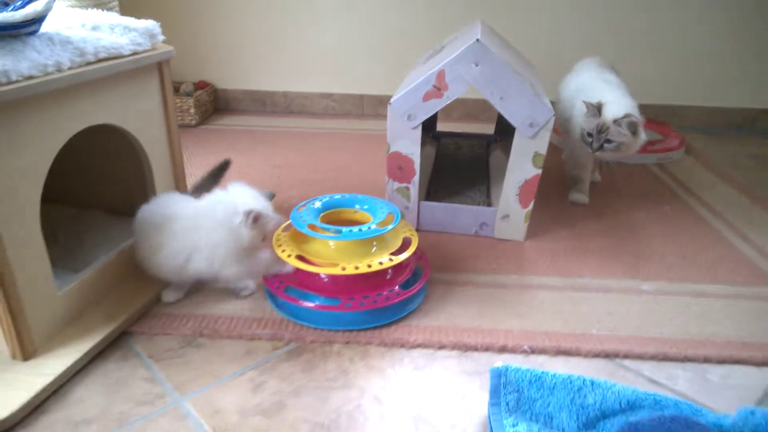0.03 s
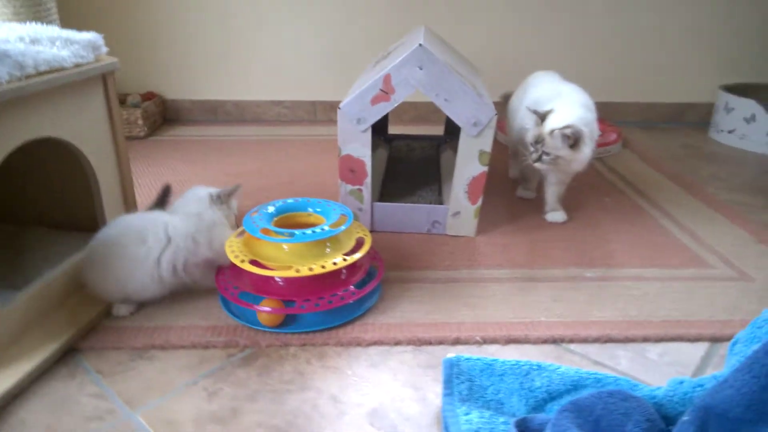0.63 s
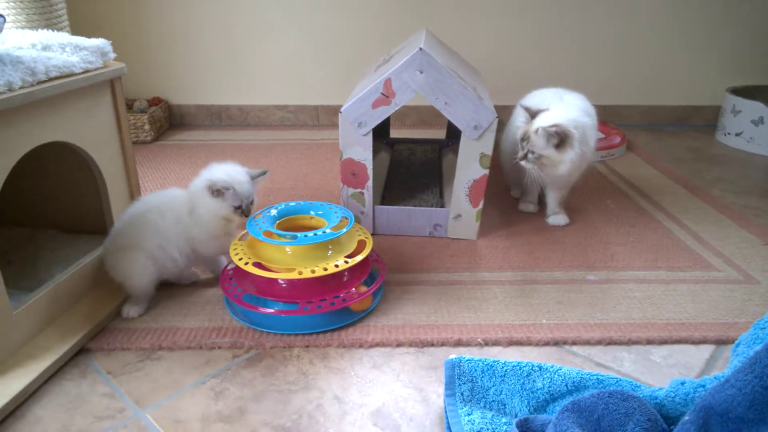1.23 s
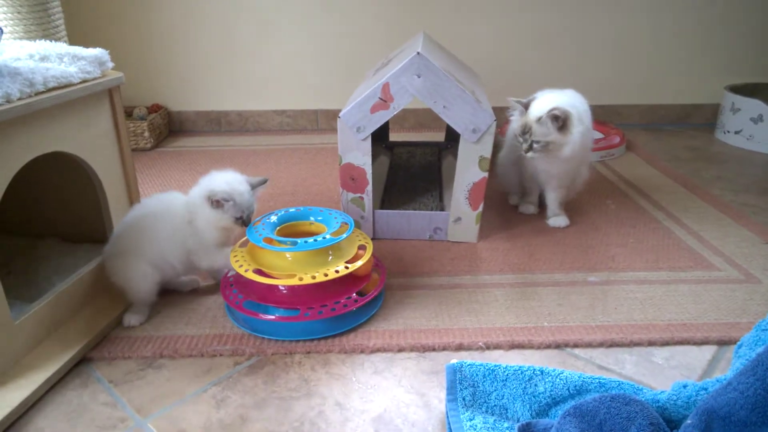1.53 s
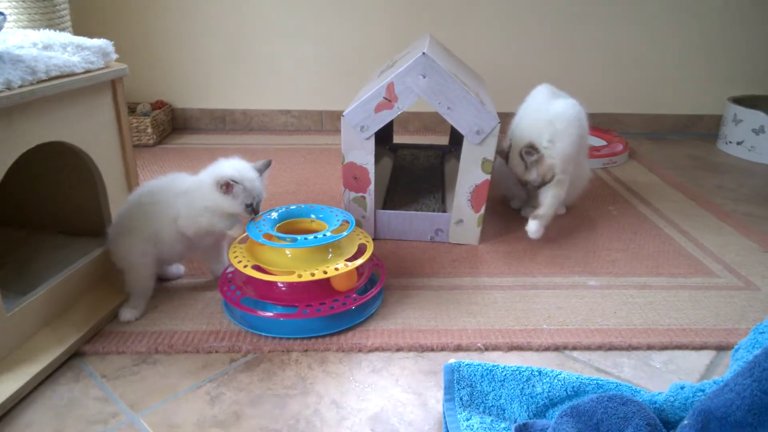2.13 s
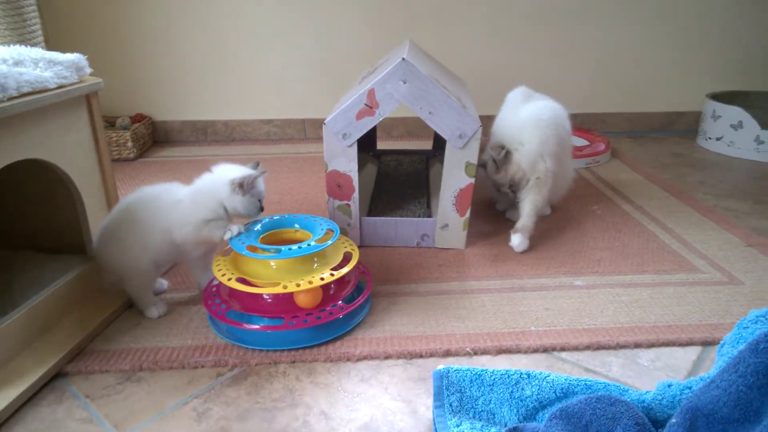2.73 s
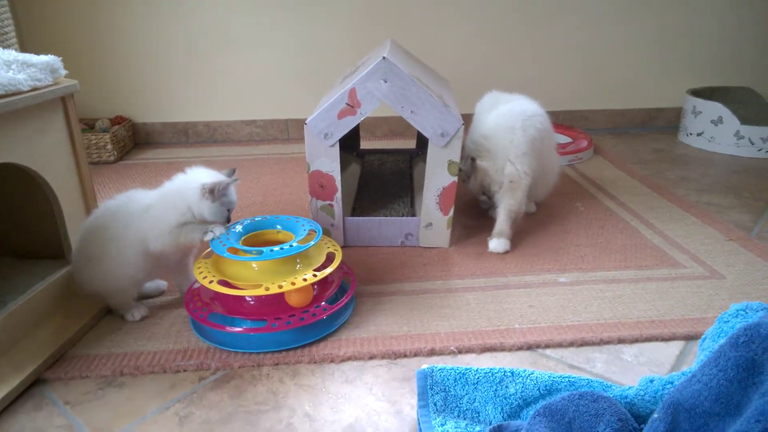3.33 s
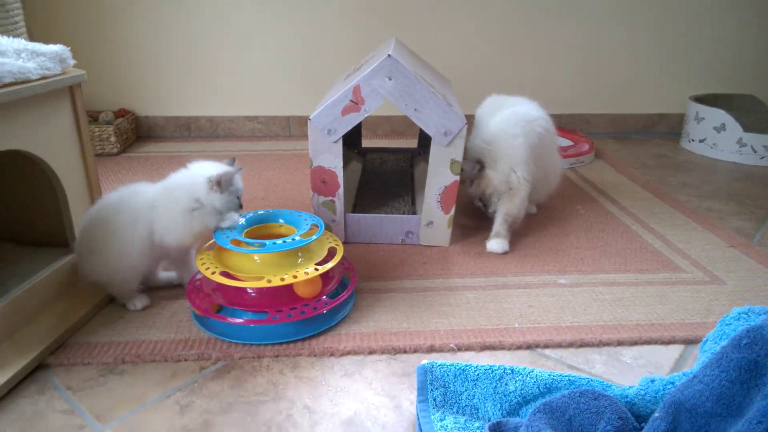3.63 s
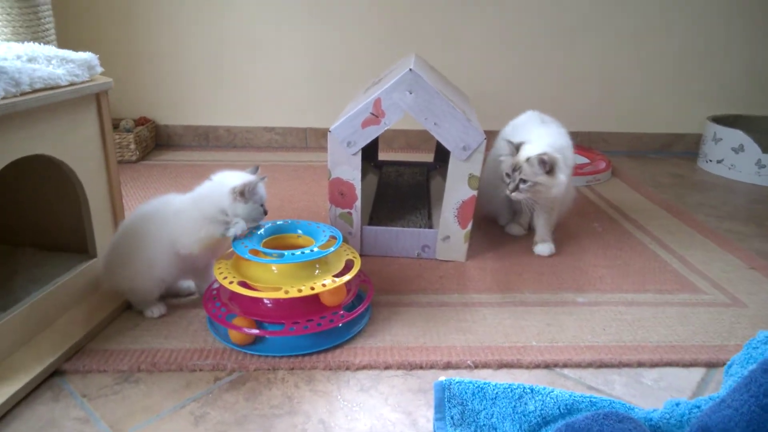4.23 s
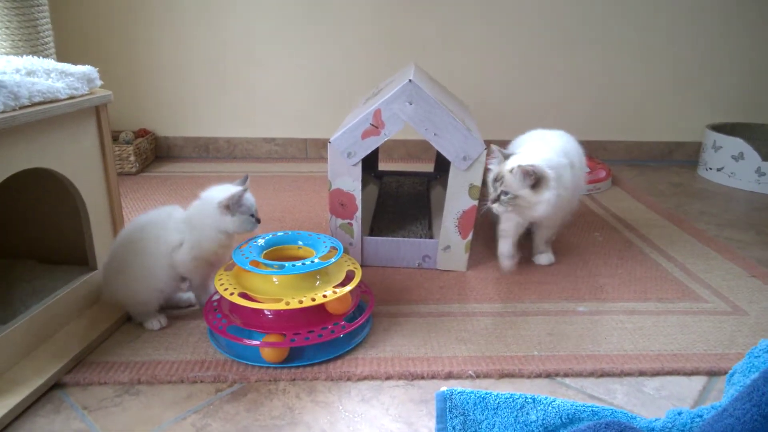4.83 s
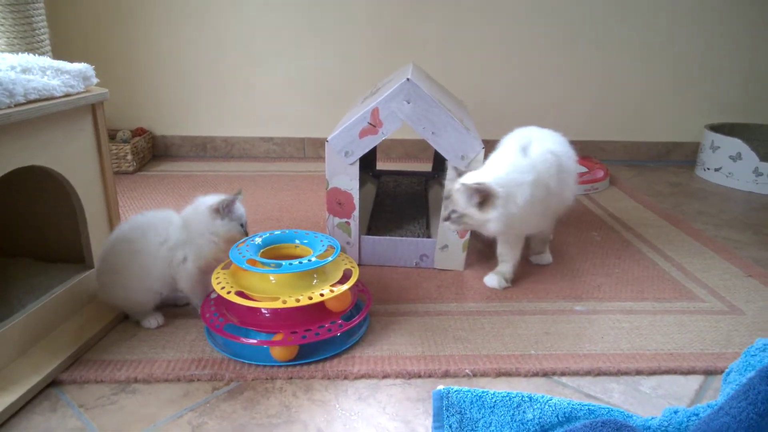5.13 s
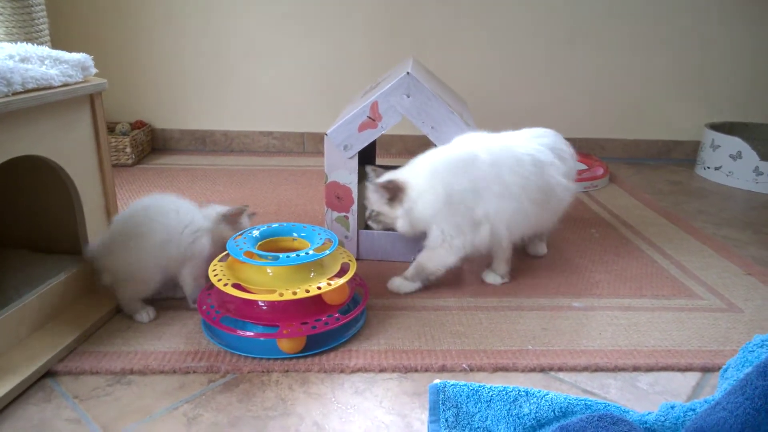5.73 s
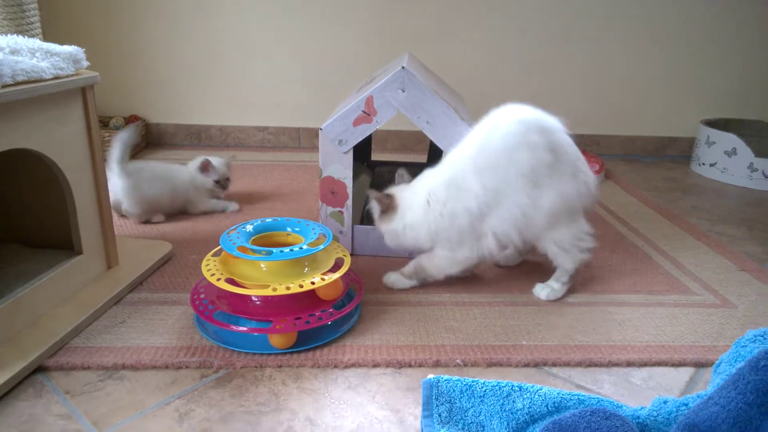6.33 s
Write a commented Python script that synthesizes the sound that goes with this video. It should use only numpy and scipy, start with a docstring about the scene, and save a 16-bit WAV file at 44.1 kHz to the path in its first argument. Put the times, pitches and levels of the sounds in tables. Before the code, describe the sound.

In a small, quiet room with a faint hum, a cat makes two fluttering calls, the first short, the second longer and smoothing into a rising coo. Before them, a ball knocks sharply in a hollow plastic toy, then rolls and rattles slowly to rest. At the end, paws thud lightly and brush over a rug. The sound is in stereo, a short way off, with a slight room ring.

```python
"""A cat gives two trilling calls, its buzzing vocal folds pinched by a flutter in the throat; the second
smooths out into a rising coo. A pair of microphones hears it in a small, quiet room with a low hum.
Before the calls a kitten bats a ball round a plastic track toy on the rug: the toy skids, and the ball
clacks, rolls and slowly comes to rest. At the end paws thud and brush over the rug."""
import sys
import numpy as np
from scipy import signal
from scipy.fft import rfft, irfft, next_fast_len
from scipy.io import wavfile
from scipy.ndimage import uniform_filter1d

SR = 44100
rng = np.random.default_rng(int(sys.argv[2]) if len(sys.argv) > 2 else 0)


def file_out(sig):
    """Save sig as 16-bit WAV at sys.argv[1]."""
    # one column per channel
    cols = np.atleast_2d(sig).T
    # limit, then scale
    lim = np.clip(cols, -1, 1)
    pcm = np.round(lim * 32767).astype(np.int16)
    wavfile.write(sys.argv[1], SR, pcm)


N = 285768
TIME = np.arange(N) / SR


def amp(db):
    """Decibels to gain."""
    return 10 ** (np.asarray(db) / 20)


def unit(x):
    """Scales to rms 1."""
    return x / np.sqrt(np.mean(x ** 2) + 1e-20)


def read(points, hz):
    """Reads a spectrum on a log-frequency axis."""
    f, value = np.transpose(points)
    return np.interp(np.log(hz + 1), np.log(f + 1), value)


def curves(rows, t):
    """Reads every column of a table at times t."""
    s, *columns = np.transpose(rows)
    return [np.interp(t, s, c) for c in columns]


def shape(x, gain):
    """Filters x by a gain given as a function of frequency."""
    n = x.shape[-1]
    size = next_fast_len(n + 2048)
    return irfft(rfft(x, size) * gain(np.fft.rfftfreq(size, 1 / SR)), size)[..., :n]


def colour(x, points, size=8192):
    """Gives x a spectrum, at rms 1; the filter is causal, so it rings after each pulse."""
    log_gain = np.log(amp(read(points, abs(np.fft.fftfreq(size, 1 / SR)))))
    kernel = np.fft.ifft(np.exp(np.conj(signal.hilbert(log_gain)))).real[:size // 2]
    return unit(np.apply_along_axis(lambda v: signal.oaconvolve(v, kernel)[:len(v)], -1, x))


def add(mix, s, sound):
    """Mixes a sound in at s seconds."""
    part = mix[..., max(round(s * SR), 0):][..., :sound.shape[-1]]
    part += sound[..., :part.shape[-1]]


# How alike the room sounds at the two microphones. Each row: frequency in Hz, likeness from 0 to 1.
MIC_LIKENESS = [(30, 0.62), (60, 0.42), (130, 0.68), (290, 0.83), (640, 0.73), (1410, 0), (3100, 0),
                (15000, 0)]


def diffuse(a, b):
    """Sound from all round reaches the microphones alike in the bass, unlike in the treble."""
    likeness = lambda f: np.clip(read(MIC_LIKENESS, f), -1, 1)
    return np.array([a, shape(a, likeness) + shape(b, lambda f: np.sqrt(1 - likeness(f) ** 2))])


# The short ring of the small room. Each row: frequency in Hz, seconds to fall 60 dB.
ROOM_DECAY = [(150, 0.32), (600, 0.39), (2000, 0.2), (8000, 0.24), (16000, 0.05)]


def room(x, wet_db, pan_db, lag_samples, scatter_hz, early_db=7):
    """Direct sound, echoes off floor and furniture, and a tail; pan and lag are left against right."""
    size = SR // 2
    echoes = rng.standard_normal((2, size)) * (rng.random((2, size)) < .15)
    hz, t, bands = signal.stft(echoes, SR, nperseg=256)
    bands *= amp(-60 * t / read(ROOM_DECAY, hz)[:, None])
    tail = diffuse(*signal.istft(bands, SR, nperseg=256)[1])
    t = np.arange(tail.shape[1]) / SR
    tail *= (t > .001) * (1 + amp(early_db) * np.exp(-t / 0.013))
    tail /= np.linalg.norm(tail[0])
    # small objects scatter the treble most
    tail = shape(tail, lambda f: (f + 60) / np.hypot(f + 60, scatter_hz))
    wet = signal.fftconvolve(x[None], tail, axes=1)[:, :N]
    left = shape(x, lambda f: np.exp(-2j * np.pi * f * lag_samples / SR))
    return (np.array([left, x]) + amp(wet_db) * wet) * amp([[pan_db / 2], [-pan_db / 2]])


# Steady air noise all round the microphones. Each row: frequency in Hz, relative level in dB.
AIR_SPECTRUM = [(15, -10), (35, -7.5), (60, -5.5), (100, -11.5), (200, -21), (320, -25), (450, -25.5),
                (850, -28.5), (1400, -35.5), (2400, -38), (6000, -44.5), (11800, -48), (13800, -42.5),
                (15800, -50.5)]
# The hum of the room. Each row: centre in Hz, width in Hz, level in dB.
HUM_BANDS = [(39.74, 11.8, -57.5), (114, 7.8, -72), (161.94, 8.2, -67), (251.8, 9, -74)]


def room_tone(air_db=-58.5, bass_pan_db=-3.0):
    """Air noise and narrow, wavering bands of hum; the bass is stronger at the right microphone."""
    tone = amp(air_db) * colour(rng.standard_normal((2, N)), AIR_SPECTRUM)
    for hz, width, db in HUM_BANDS:
        band = shape(rng.standard_normal((2, N)), lambda f: 1 / (1 + (2 * (f - hz) / width) ** 2))
        tone += amp(db) * unit(band)
    sides = np.array([[.5], [-.5]])
    return shape(diffuse(*tone), lambda f: amp(sides * bass_pan_db / (1 + (f / 220) ** 4)))


# Paws landing on the rug. Each row: start in seconds, level in dB, cutoff in Hz, seconds to fall 60 dB.
PAW_FALLS = [(.722, -54, 433, 0.13), (6.029, -51, 1340, 0.17), (6.044, -58, 1220, 0.42),
             (6.297, -61, 1220, 0.091), (6.318, -55, 574, 0.23)]
# Fur and claws brushing rug and toy.
# Each row: midpoint in seconds, length in seconds, level in dB, centre in Hz, width in octaves.
FUR_BRUSHES = [(.468, .05, -70, 9600, .18), (.93, .12, -76, 9300, .4), (1.36, .19, -71, 8500, .87),
               (1.863, .026, -63.5, 3300, .48), (1.971, .045, -66.5, 10400, .47),
               (3.627, .098, -78, 4770, .092), (5.806, .12, -72.5, 5750, .57),
               (6.029, .05, -67.5, 5560, .41), (6.325, .21, -72.5, 3830, .9)]
# A broad scuff on the rug. Each row: frequency in Hz, relative level in dB.
SCUFF_SPECTRUM = [(500, -20), (1050, 0), (1650, -12), (2600, -3), (3600, -9), (8000, -9), (12000, -10),
                  (16000, -14)]


def paws(scuff_mid_s=6.118, scuff_length_s=.086, scuff_db=-55.5):
    """Down on the rug: dull thuds, soft swishes, and one scuff as the kitten springs away."""
    out, t = np.zeros(N), np.arange(SR // 3) / SR
    fibres = lambda: rng.standard_normal(len(t)) * amp(1.5 * rng.standard_normal(len(t)))
    stroke = lambda length: np.sin(np.pi * np.minimum(t / length, 1)) ** 2
    for s, db, dull_hz, t60 in PAW_FALLS:
        band = lambda f: f ** 2 / (f ** 2 + 140 ** 2) / (1 + (f / dull_hz) ** 8)
        thud = unit(shape(rng.standard_normal(len(t)), band))
        add(out, s, amp(db - 60 * t / t60) * thud)
    for s, length, db, centre_hz, octaves in FUR_BRUSHES:
        band = lambda f: np.exp(-.5 * (np.log2((f + 1) / centre_hz) / octaves) ** 2)
        swish = unit(shape(fibres(), band))
        add(out, s - length / 2, amp(db) * swish * stroke(length))
    scuff = colour(fibres(), SCUFF_SPECTRUM) * stroke(scuff_length_s)
    add(out, scuff_mid_s - scuff_length_s / 2, amp(scuff_db) * scuff)
    return room(out, wet_db=-2, pan_db=0.5, lag_samples=-1.6, scatter_hz=900)


# Modes of the hollow plastic track and of its thin walls.
# Each row: frequency in Hz, relative level in dB, seconds to fall 60 dB.
HOLLOW_MODES = [(472.4, -0.5, 0.14), (530.3, -4.5, 0.11), (623, -18, 0.17), (680, -1.5, 0.032),
                (830, -7.5, 0.028)]
WALL_MODES = [(1070, -4, 0.048), (1188, -4, 0.1), (1402, 0.5, 0.035), (1495, -4, 0.078),
              (1653, -2.5, 0.048), (1905, -1, 0.038), (2180, -3.5, 0.036), (2340, -8, 0.027),
              (2640, -14, 0.023), (3390, -12, 0.052)]


def track_ring(modes, t, vary):
    """Modes of the track after a blow; their weights vary with the place that is struck."""
    hz, db, t60 = np.transpose(modes)[:, :, None]
    weight = amp(db) * (1 + vary * (2 * rng.random(hz.shape) - 1))
    weight *= np.sign(rng.standard_normal(hz.shape))
    hz = hz * (1 + 0.039 * vary * rng.standard_normal(hz.shape))  # the ball's weight shifts the modes
    ring = (weight * amp(-60 * t / t60) * np.cos(2 * np.pi * hz * t)).sum(0)
    return ring / np.sqrt(np.mean(ring[t < .01] ** 2))


def bumps(per_s=900, spread_db=0):
    """Tiny impacts at random moments, of uneven strength."""
    impacts = rng.standard_normal(N) * (rng.random(N) < per_s / SR)
    return impacts * amp(spread_db * rng.uniform(-1, 1, N))


def ringing(taps, modes):
    """A train of taps keeps modes of the track ringing."""
    ring = track_ring(modes, np.arange(SR // 3) / SR, vary=0)
    return unit(signal.fftconvolve(taps, ring)[:N])


# The batted toy skids on the rug. Each row: start in seconds, length in seconds, level in dB.
TOY_SKIDS = [(.046, .022, -57), (.1, .048, -55), (.163, .14, -56)]
# The toy's gritty scrape, and its hiss on the rug. Each row: frequency in Hz, relative level in dB.
SCRAPE_SPECTRUM = [(400, -17.5), (900, 8.5), (1400, -7), (2300, -3), (3200, -9), (6000, -20.5),
                   (7600, -19.5), (11000, -20), (16000, -17.5)]
RUG_HISS_SPECTRUM = [(300, -20), (1800, 3), (3500, -2.5), (6000, -6), (8000, 0), (11500, -2), (16000, -7)]


def toy_skids(hollow_db=5, scrape_db=-2.5, hiss_db=-3.5, rise_s=.008, sag_db_per_s=40, stop_db_per_s=350):
    """Each skid starts at once, sags and stops; it shakes the whole toy and hisses on the rug."""
    level = np.zeros(N)
    for s, length, db in TOY_SKIDS:
        t = np.maximum(TIME - s, 0)
        fall_db = sag_db_per_s * t + stop_db_per_s * np.maximum(t - length, 0)
        level += np.minimum(t / rise_s, 1) * amp(db - fall_db)
    shake = amp(hollow_db) * ringing(bumps(), HOLLOW_MODES) + ringing(bumps(), WALL_MODES)
    scrape = amp(scrape_db) * colour(bumps(), SCRAPE_SPECTRUM)
    hiss = amp(hiss_db) * colour(bumps() + 0.094 * rng.standard_normal(N), RUG_HISS_SPECTRUM)
    return room((shake + scrape + hiss) * level, wet_db=0, pan_db=0.2, lag_samples=-.95, scatter_hz=1170)


# The ball rolls on, is nudged at about 1 s and dies away.
# Each row: time in seconds, rumble level in dB, scrape and rattle level in dB.
ROLL_LEVELS = [(0, -68, -70), (.45, -55, -70), (.66, -71, -70), (.88, -67, -72), (1.0, -54, -70),
               (1.22, -60, -73), (1.42, -68, -86), (1.75, -63, -88), (2.12, -73, -88), (2.3, -67, -75),
               (2.7, -68, -83), (2.95, -90, -77), (3.6, -90, -90)]
# Light ticks of the rattling ball. Each row: frequency in Hz, relative level in dB.
TICK_SPECTRUM = [(500, -16), (1000, -6), (1900, -1), (2700, 0), (3800, -7), (5500, -19), (9000, -19),
                 (16000, -30)]


def ball_roll(rumble_db=-2, walls_db=-6, scrape_db=-4, rattle_db=-9, tick_db=-11):
    """Bumps under the ball make the track ring and scrape; at random it rattles against the walls."""
    low_db, grit_db = curves(ROLL_LEVELS, TIME)
    rumble = amp(rumble_db) * ringing(bumps(), HOLLOW_MODES)
    walls = amp(walls_db) * ringing(bumps(), WALL_MODES)
    scrape = amp(scrape_db) * colour(bumps(), SCRAPE_SPECTRUM)
    taps = bumps(per_s=28, spread_db=3)
    rattle = amp(rattle_db) * ringing(taps, WALL_MODES) + amp(tick_db) * colour(taps, TICK_SPECTRUM)
    ball = rumble * amp(low_db) + (walls + scrape + rattle) * amp(grit_db)
    return room(ball, wet_db=0, pan_db=0.2, lag_samples=-2.2, scatter_hz=1170)


# Clear knocks of the ball, midway between the microphones.
# Each row: start in seconds, then relative levels in dB of hollow ring, wall clack and hard snap.
BALL_KNOCKS = [(.043, -46, -55, -44), (.052, -43, -50, -43), (.058, -45, -55, -45), (.083, -28, -36, -32),
               (.089, -36, -44, -58), (.113, -45, -42, -43), (.163, -41, -41, -47), (.177, -52, -43, -53),
               (.194, -42, -43, -57), (.219, -45, -47, -67), (.381, -56, -66, -51), (.71, -59, -67, -67),
               (.822, -54, -65, -68), (.931, -57, -61, -74), (1.0, -49, -75, -82), (1.085, -70, -62, -77),
               (1.235, -58, -51, -50.5), (1.319, -56, -66, -69), (1.687, -50, -76, -72),
               (1.794, -52, -62, -69), (1.815, -47.5, -64, -82), (2.255, -59, -62, -68),
               (2.374, -62, -61, -65), (2.485, -56, -59, -68)]
# The hard snap of ball on plastic. Each row: frequency in Hz, relative level in dB.
SNAP_SPECTRUM = [(300, -27), (900, -5), (2000, 0), (3500, 0.5), (5000, -4), (6400, -10.5), (7500, 0.5),
                 (9000, -2.5), (10600, 2), (12500, -4), (16000, -19)]


def ball_knocks(ring_db=-2.5, clack_db=-4.0, snap_db=4, snap_t60=0.0092,
                tick_db=-6, tick_t60=.04, damping_per_s=45, contact_s=.0015):
    """Each knock is a hard snap, a clack of the walls with a light tick, and the track's hollow ring."""
    out, t = np.zeros(N), np.arange(SR // 3) / SR
    hardest_db = max(row[1] for row in BALL_KNOCKS)
    for s, hollow_db, wall_db, hard_db in BALL_KNOCKS:
        force = amp(hollow_db - hardest_db)
        # a hard blow is brighter, and presses the toy into the rug
        modes = [(hz, db + 9 * force * np.log2(hz / HOLLOW_MODES[0][0]), t60)
                 for hz, db, t60 in HOLLOW_MODES]
        hollow = track_ring(modes, t, vary=0.6) * np.exp(-damping_per_s * force * t)
        hollow *= 1 - np.exp(-t * (1 + 9 * force) / contact_s)  # a gentle one presses longer: soft start
        clack = track_ring(WALL_MODES, t, vary=0.61)
        clack += colour(rng.standard_normal(len(t)), TICK_SPECTRUM) * amp(tick_db - 60 * t / tick_t60)
        snap = colour(rng.standard_normal(len(t)), SNAP_SPECTRUM) * amp(-60 * t / snap_t60)
        add(out, s, amp(hollow_db + ring_db) * hollow)
        add(out, s, amp(wall_db + clack_db) * clack)
        add(out, s, amp(hard_db + snap_db) * snap)
    return room(out, wet_db=-3, pan_db=0.0, lag_samples=-1.12, scatter_hz=1180)


def fold_turns(hz, beat, depth, slip=0.094):
    """Vocal fold cycles: after each deep pinch they start afresh, nearly in step with the flutter."""
    turns = np.cumsum(hz) / SR
    pinches = np.flatnonzero(np.diff(np.floor(beat + .5)))
    cycles = np.diff(turns[pinches], prepend=0)
    restart = np.round(cycles) - cycles + slip * rng.standard_normal(len(cycles))
    jumps = np.zeros(len(hz))
    jumps[pinches] = restart * np.minimum(2 * depth[pinches], 1) ** 2
    return turns + uniform_filter1d(np.cumsum(jumps), size=260)


def call(voice, flutter, throat, swing, jitter, air, rough, rough_per_db,
         hum_db, hum_follow, ring_db, edge_db, edge_follow, edge_lag_s,
         coo_s=5.145, coo_half_s=.09, coo_ease=.76, coo_edge_db=-8):
    """Vocal folds buzz while a slowing flutter pinches them; the pitch sags at each pinch."""
    t = np.arange(voice[0][0], voice[-1][0], 1 / SR)
    hz, effort_db = curves(voice, t)
    top_db = effort_db.max()
    slack_db = top_db - effort_db
    # in the coo that ends the trill the throat relaxes: flutter, roughness and edge all ease
    coo = np.exp(-((t - coo_s) / coo_half_s) ** 4)
    tension = 1 - coo_ease * coo
    beat_s, beats_per_s, slowing, depth = flutter
    beat = beats_per_s * (t - beat_s) - slowing * (t - beat_s) ** 2 / 2
    gape = np.cos(2 * np.pi * beat)  # -1 at each pinch
    depth = np.clip(depth * tension, 0, 1)
    rough = np.clip((rough + rough_per_db * slack_db) * tension, 0, 1)  # a weak voice is rougher
    wobble = unit(shape(rng.standard_normal(len(t)), lambda f: 1 / (1 + (f / 130) ** 4)))
    pitch_hz = hz * (1 + swing * depth * (gape - .5) + jitter * rough * wobble)
    turns = fold_turns(pitch_hz, beat, depth)
    folds = unit(np.cos(2 * np.pi * np.arange(1, 25)[:, None] * turns).sum(0))
    puffs = unit((1 + 0.23 * np.cos(2 * np.pi * turns)) * rng.standard_normal(len(t)))
    puffs = shape(puffs, lambda f: np.sqrt(1 + (f / 1500) ** 2))  # air noise grows towards the treble
    sound = colour(((1 - rough) * folds + air * rough * puffs) / np.hypot(1 - rough, rough), throat)
    # effort drives the open-mouth ring directly, the nasal hum and buzzing edge by their follow factors
    below = lambda f, cutoff_hz: 1 / (1 + (f / cutoff_hz) ** 16)
    hum = unit(shape(sound, lambda f: below(f, 567))) * amp(hum_db - hum_follow * slack_db)
    ring = unit(shape(sound, lambda f: below(f, 2080) - below(f, 620))) * amp(ring_db - slack_db)
    edge = unit(shape(sound, lambda f: 1 - below(f, 2060)))
    late_slack_db = np.interp(t - edge_lag_s, t, slack_db)
    edge *= amp(edge_db - edge_follow * late_slack_db + coo_edge_db * coo)
    opening = (1 + depth * gape) / np.sqrt(1 + depth ** 2 / 2)
    return t[0], amp(top_db) * (hum + ring + edge) * opening * signal.windows.tukey(len(t), .09)


# The course of each call. Each row: time in seconds, pitch in Hz, effort in dB.
CHIRRUP_VOICE = [(3.69, 346, -79), (3.73, 348, -60), (3.76, 353, -52), (3.785, 360, -44), (3.83, 366, -41),
                 (3.935, 362, -44), (4.0, 351, -54), (4.075, 319, -63.5), (4.2, 310, -81)]
TRILL_VOICE = [(4.51, 379, -73), (4.56, 378, -49.5), (4.69, 368, -54.5), (4.79, 369, -51),
               (4.92, 365, -57.5), (5.07, 361, -57.5), (5.16, 381, -47), (5.24, 389, -54.5),
               (5.3, 380, -82)]
# The resonances of the throat in each call. Each row: frequency in Hz, relative level in dB.
CHIRRUP_RESONANCES = [(150, -45), (250, -3), (320, -6), (400, -2.5), (530, -14), (720, 2), (1080, -2),
                      (1270, -16), (1820, -17), (2100, -29), (3200, -22.5), (4400, -21.5), (5300, -45),
                      (9000, -52)]
TRILL_RESONANCES = [(150, -39.5), (280, -9.5), (360, -2), (550, -12), (700, -5), (790, 0), (1160, -10.5),
                    (1520, -7), (1860, -17.5), (2050, -26.5), (2700, -27), (3400, -36.5), (4550, -31.5),
                    (5000, -53), (9000, -65)]
# The flutter of the throat. Each holds: time of one beat in seconds, beats per second at that time,
# slowing in beats per second each second, depth from 0 to 1.
CHIRRUP_BEATS = (3.845, 44, 52, .6)
TRILL_BEATS = (4.587, 39.3, 11, .44)


def cat():
    """A short chirrup, then a long trill, far enough from the microphones for the room to ring."""
    out = np.zeros(N)
    add(out, *call(CHIRRUP_VOICE, CHIRRUP_BEATS, CHIRRUP_RESONANCES,
                   swing=.05, jitter=.077, air=1.13, rough=.32, rough_per_db=.014,
                   hum_db=-5.5, hum_follow=.45, ring_db=-2,
                   edge_db=-25, edge_follow=1.1, edge_lag_s=.055))
    add(out, *call(TRILL_VOICE, TRILL_BEATS, TRILL_RESONANCES,
                   swing=.068, jitter=.11, air=2.2, rough=.215, rough_per_db=.004,
                   hum_db=.2, hum_follow=.46, ring_db=-.7,
                   edge_db=-24, edge_follow=.7, edge_lag_s=.005))
    return room(out, wet_db=0.0, pan_db=1.5, lag_samples=2.2, scatter_hz=1640)


def scene():
    """Cat, toy and paws over the hum of the room, all from one microphone position."""
    return cat() + ball_knocks() + toy_skids() + ball_roll() + paws() + room_tone()


def record(dry, cutoff_hz=15850):
    """The recorder's band limit takes the highest treble off both microphones."""
    lowpass = signal.firwin(511, cutoff_hz, window=("kaiser", 9), fs=SR)
    return signal.oaconvolve(dry, lowpass[None], "same")


dry = scene()
out = record(dry)
file_out(out)
```